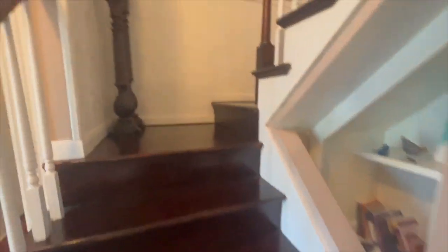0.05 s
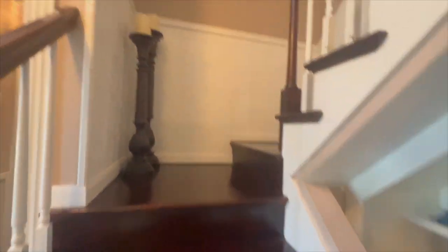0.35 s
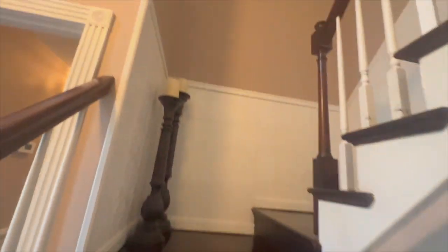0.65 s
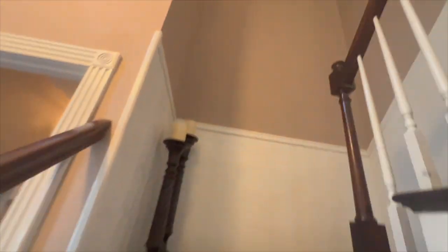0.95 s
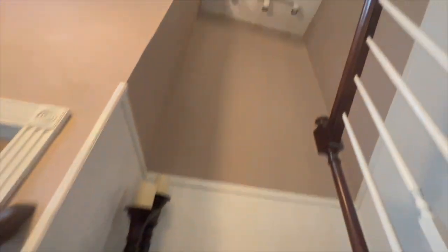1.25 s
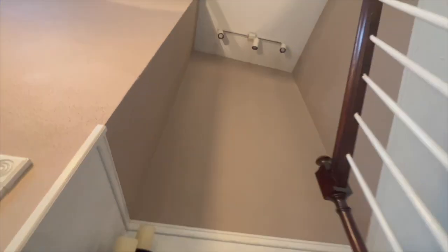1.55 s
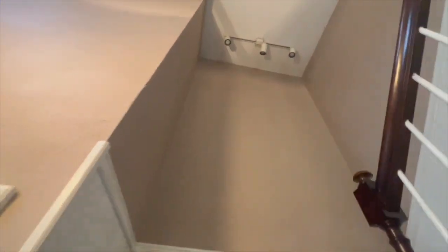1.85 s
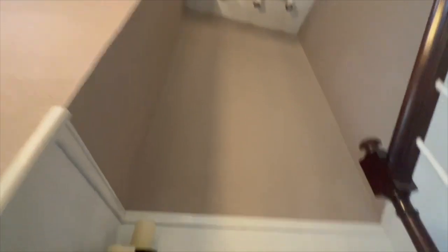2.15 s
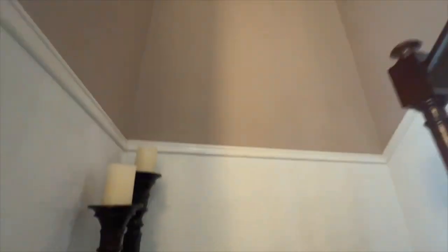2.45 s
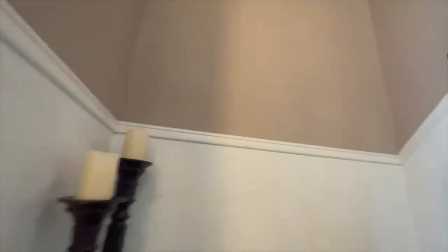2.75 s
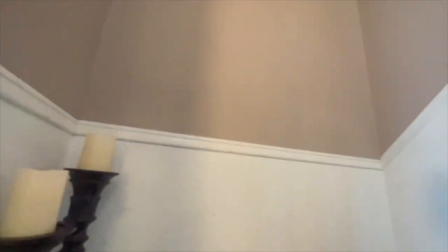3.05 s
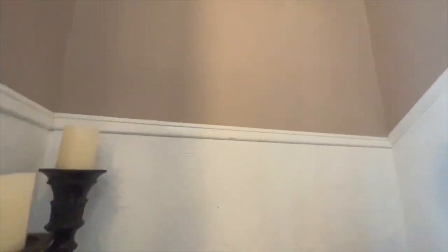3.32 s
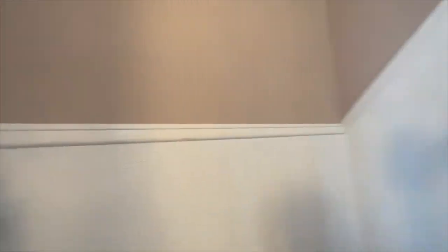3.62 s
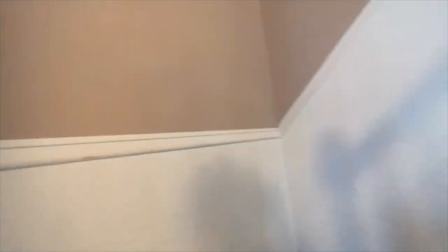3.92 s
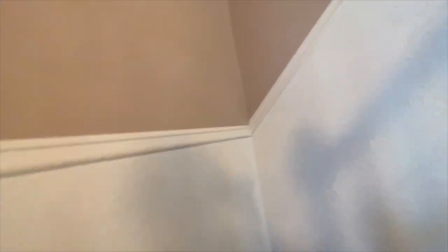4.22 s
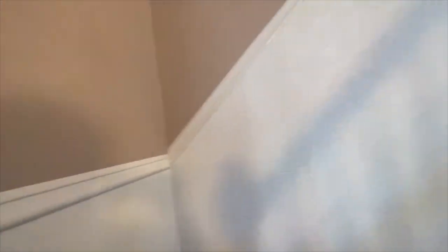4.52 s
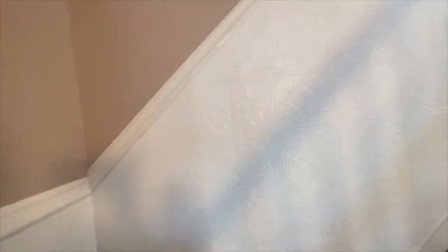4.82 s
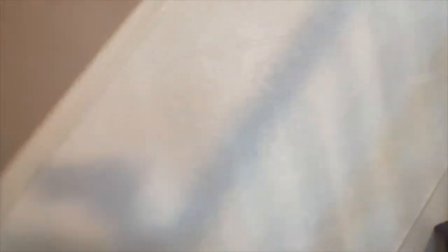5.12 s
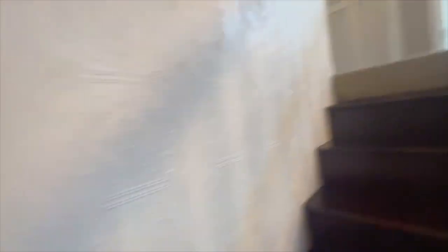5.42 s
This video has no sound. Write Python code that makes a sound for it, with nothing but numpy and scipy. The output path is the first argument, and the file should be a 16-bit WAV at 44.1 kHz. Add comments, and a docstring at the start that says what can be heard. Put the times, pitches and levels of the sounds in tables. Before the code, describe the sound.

Soft footsteps climb a hardwood staircase, heard up close in a stairwell with a short ring. Quiet ventilation and a low, wavering electrical hum continue throughout. A light first step lands at about 0.6 seconds, with sharp wood snaps just before it and near 0.9. Fuller, hollow thuds follow at about 1.5, 2.4, 3.2 and 4.0 seconds, each with small creaks and a faint brush of clothing. Around 1.5 seconds a hand gives a faint, slightly falling squeak on the rail. From 4.0 to 5.1 seconds it gets busier: the feet shuffle lightly, joints snap sharply, boards creak more loudly and fabric swishes. A small metal piece, barely heard earlier, tinkles several times between 4.6 and 5.3 seconds. A last deep step lands at 5.0 seconds, followed by faint creaks and a sleeve rustle at about 5.5.

```python
"""Soft steps up a wooden staircase

Someone climbs hardwood stairs in soft footwear, heard up close over ventilation and a mains hum.
Each footfall drums a hollow tread; joints snap and boards creak under the weight. A hand squeaks on
the rail, clothes brush with the stride and a small metal piece tinkles. The stairwell rings briefly."""
import sys
import numpy as np
from scipy import signal
from scipy.fft import rfft, irfft, next_fast_len
from scipy.io import wavfile
from scipy.ndimage import uniform_filter1d

SR = 44100
rng = np.random.default_rng(int(sys.argv[2]) if len(sys.argv) > 2 else 0)


def store_wav(level_fs):
    """Save 16-bit WAV to argv[1]."""
    pcm = np.round(np.clip(np.atleast_2d(level_fs), -1, 1) * 32767)
    wavfile.write(sys.argv[1], SR, pcm.T.astype(np.int16))


N = 245759
TIME = np.arange(N) / SR


def amp(db):
    """Decibels to gain."""
    return 10 ** (np.asarray(db) / 20)


def unit_rms(x):
    """Scales to rms 1."""
    return x / np.sqrt(np.mean(x ** 2) + 1e-20)


def curve_at(points, hz):
    """Reads a curve on a log-frequency axis."""
    f, value = np.transpose(points)
    return np.interp(np.log(hz + 1), np.log(f + 1), value)


def automation(rows):
    """Each column of a timed table, ramped from sample to sample."""
    times, *columns = np.transpose(rows)
    return [np.interp(TIME, times, column) for column in columns]


def eq(x, curve):
    """Filters by an EQ curve in dB."""
    size = next_fast_len(N + 4096)
    gain = amp(curve_at(curve, np.fft.rfftfreq(size, 1 / SR)))
    return irfft(rfft(x, size) * gain, size)[..., :N]


def band(x, hz, spread, order=1):
    """Band-pass from hz / spread to hz * spread."""
    edges = [hz / spread, min(hz * spread, .48 * SR)]
    return signal.sosfilt(signal.butter(order, edges, "bandpass", fs=SR, output="sos"), x)


def lowpass(x, hz, order=2):
    """Rolls off the treble above hz."""
    return signal.sosfilt(signal.butter(order, hz, fs=SR, output="sos"), x)


def ring(modes, t):
    """Damped modes struck at time zero."""
    return sum(amp(db - 60 * t / t60) * np.cos(2 * np.pi * hz * t) for hz, db, t60 in modes)


def pan(pan_db):
    """Stereo gains; pan is always left minus right in dB."""
    return amp([[pan_db / 2], [-pan_db / 2]])


def place(mix, start, sound, db, pan_db):
    """Adds a sound to the mix, its peak set to db before panning."""
    part = mix[:, max(round(start * SR), 0):][:, :sound.shape[-1]]
    part += (sound / abs(sound).max() * amp(db) * pan(pan_db))[:, :part.shape[1]]


# reverb time of the stairwell: f/Hz, t60/s
REVERB_DECAY = [(60, 0.54), (130, 0.35), (280, 0.73), (600, 0.29), (1500, 0.25), (5000, 0.26),
                (10000, 0.35), (16000, 0.18)]
# tone of the wall reflections: f/Hz, level/dB
REVERB_EQ = [(60, -4), (150, -5), (255, 2.5), (390, 2), (600, 5), (2000, 2), (8000, -5), (14000, -2)]
def stairwell(x, wet_db, mono_below_hz):
    """Adds dense reflections that die away band by band and narrow to mono in the bass."""
    hz, t, bins = signal.stft(rng.standard_normal((2, SR * 3 // 4)), SR, nperseg=256)
    likeness = 1 / (1 + (hz[:, None] / mono_below_hz) ** 2)
    bins[1] = likeness * bins[0] + np.sqrt(1 - likeness ** 2) * bins[1]
    decay = amp(-60 * t / curve_at(REVERB_DECAY, hz)[:, None])
    tail = signal.istft(bins * decay, SR, nperseg=256)[1]
    tail *= np.clip(np.arange(tail.shape[1]) / SR / 0.0035 - 1, 0, 1)  # pre-delay to the nearest wall
    wet = signal.fftconvolve(x, tail / np.linalg.norm(tail[0]), axes=1)[:, :N]
    return x + amp(wet_db) * eq(wet, REVERB_EQ)


# room tone of the house: f/Hz, level/dB
VENTILATION_EQ = [(20, -47), (45, 2.5), (65, 3), (110, 5), (170, -6), (260, -9.5), (400, -10.5), (700, -21),
                  (1400, -21), (1800, -14), (2400, -28), (5000, -35), (9000, -34.5), (15000, -46.5)]
# its stereo image: f/Hz, left-right correlation
VENTILATION_LIKENESS = [(50, 0.53), (150, 0.79), (400, 0.43), (1000, 0.047), (3000, 0.033), (15000, 0.19)]
def ventilation():
    """A steady bed of moving air and rumble, narrow in the bass and wide in the treble."""
    left, other = rfft(rng.standard_normal((2, N + 1)))
    likeness = curve_at(VENTILATION_LIKENESS, np.fft.rfftfreq(N + 1, 1 / SR))
    right = likeness * left + np.sqrt(1 - likeness ** 2) * other
    return amp(-52.5) * unit_rms(eq(irfft([left, right])[:, :N], VENTILATION_EQ))


# the fundamental swells and shifts along the climb through standing waves: t/s, level/dB, pan/dB
HUM_RIDE = [(0, -58.5, -4), (0.7, -50.5, -0.5), (1.7, -55, -12), (2.2, -46.5, -5.5), (2.65, -43.5, 2.5),
            (3, -41.5, 6), (3.7, -37.5, 2.5), (4.3, -45.5, 14), (4.7, -50, -13), (5.25, -42, -5.5),
            (5.57, -41.5, -3)]
def mains_hum(hz=120):
    """An appliance hums at twice the mains frequency, with two faint, steady overtones."""
    phase = 2 * np.pi * hz * TIME
    db, pan_db = automation(HUM_RIDE)
    fundamental = amp(db + np.array([pan_db, -pan_db]) / 2) * np.sin(phase)
    return fundamental + amp(-67.5) * np.sin(2 * phase) + amp(-75.5) * np.sin(3 * phase)


def cloth(strokes, tone, attack_share, slide_db, fade_20db_s, grain_db):
    """Fibres catch in tiny patches: grainy noise that swells, slides on and fades with each stroke."""
    hz, t, bins = signal.stft(rng.standard_normal((2, N)), SR, nperseg=256)
    octaves = np.log2(np.maximum(hz, 500) / 5000)
    power = 0
    for start, length, db, tilt in strokes:
        spectrum = unit_rms(amp(curve_at(tone, hz) + tilt * octaves))
        progress = np.clip((t - start) / length, 0, 1)
        attack = np.minimum(progress / attack_share, 1)
        release_db = -20 * np.maximum(t - start - length, 0) / fade_20db_s
        envelope = attack * amp(db + slide_db * progress + release_db)
        power = power + np.outer(spectrum, envelope) ** 2
    patches = uniform_filter1d(rng.standard_normal(power.shape), size=20, axis=0)
    patches = unit_rms(uniform_filter1d(patches, size=4, axis=1))
    return signal.istft(bins * np.sqrt(power) * amp(grain_db * patches), SR, nperseg=256)[1][:, :N]


# leg swishes: t/s, length/s, level/dB, tilt/(dB per octave)
TROUSER_STROKES = [(.76, 0.47, -63, -5), (1.48, 0.1, -59, -4), (1.75, 0.21, -57.5, 6),
                   (1.95, 0.34, -54.5, 3), (2.42, 0.46, -61, -6), (3.58, 0.61, -68.5, -3),
                   (4.07, 0.098, -55, -5), (4.28, .12, -55, -5.5), (4.52, 0.17, -53.5, -2.5),
                   (4.72, 0.37, -56.5, -6), (5.02, 0.14, -51, -1.5)]
# tone of the trouser fabric: f/Hz, level/dB
TROUSER_EQ = [(300, -14.5), (900, -4.5), (2500, -5.5), (3500, -8.5), (4500, -6), (6500, -1), (9000, 0.5),
              (11000, -4.5), (15500, -17)]
def trousers():
    """Trouser cloth brushes as a leg swings."""
    return pan(1.5) * cloth(TROUSER_STROKES, TROUSER_EQ,
                            attack_share=0.33, slide_db=-1.56, fade_20db_s=0.29, grain_db=1.5)


# arm swishes: t/s, length/s, level/dB, tilt/(dB per octave)
SLEEVE_STROKES = [(.01, 0.25, -58, 5.5), (2.65, 0.27, -55, 2.5), (3.38, 0.3, -63, 6.5),
                  (4.24, 0.32, -51.5, -2), (4.63, 0.28, -55.5, -1.5), (5.42, 0.23, -58, 4)]
# tone of the sleeve fabric: f/Hz, level/dB
SLEEVE_EQ = [(500, -11), (1500, -5), (3000, -7), (3950, -5), (4420, 2.5), (5100, -3), (5800, 1),
             (7000, -1.5), (8500, -0.5), (9800, -5), (11000, -13), (15500, -31)]
def sleeve():
    """The left sleeve slides as the arm reaches forward."""
    return pan(6.5) * cloth(SLEEVE_STROKES, SLEEVE_EQ,
                            attack_share=0.23, slide_db=-4.5, fade_20db_s=0.2, grain_db=1.3)


# modes of the small metal piece: f/Hz, level/dB, t60/s
METAL_MODES = [(9650, -7.5, 0.056), (9740, 8, 0.0093), (11050, -11, 0.017), (4330, -13, 0.019),
               (10060, -13, 0.02)]
# its shakes: t/s, level/dB
TINKLE_CUES = [(.060, -41.5), (1.433, -45.5), (3.645, -49.5), (4.6, -37), (4.619, -41), (4.681, -37.5),
               (4.792, -45), (4.86, -37), (4.887, -42), (4.956, -42), (5.264, -35.5), (5.297, -52)]
def tinkles():
    """Light metal, shaken by the stride, chatters for a moment and rings near its few high modes."""
    out, t = np.zeros((2, N)), np.arange(4096) / SR
    swell = t / 0.0056
    for start, db in TINKLE_CUES:
        chatter = rng.standard_normal((2, len(t))) * swell * np.exp(-swell)
        detune = 1 + 0.0142 * rng.standard_normal()
        metal = ring(METAL_MODES, t * detune)
        ringing = unit_rms(signal.fftconvolve(chatter, metal[None], axes=1)[:, :len(t)])
        sizzle = unit_rms(band(chatter, 7700, spread=1.6, order=2))
        place(out, start - .003, ringing + 0.29 * sizzle, db, pan_db=-3.5)
    return stairwell(out, wet_db=-4.5, mono_below_hz=405)


# the palm dragging on the rail: t/s, level/dB, f/Hz
SQUEAK_GLIDE = [(1.412, -62, 1540), (1.432, -58.5, 1535), (1.465, -55, 1500), (1.51, -58, 1418),
                (1.58, -56, 1430), (1.625, -58.5, 1387), (1.68, -73, 1370)]
def rail_squeak():
    """Skin on varnish: a raspy, fuzzy whistle that sinks as the hand slows."""
    db, hz = automation(SQUEAK_GLIDE)
    noise = rng.standard_normal((2, N))
    flutter = unit_rms(lowpass(noise, 85))
    rasp = unit_rms(lowpass(noise[::-1], 420))
    wobble = flutter + 0.58 * rasp
    phase = 2 * np.pi * np.cumsum(hz) / SR
    whistle = unit_rms(wobble[0] * np.cos(phase) - wobble[1] * np.sin(phase))
    gate = (TIME > SQUEAK_GLIDE[0][0]) & (TIME < SQUEAK_GLIDE[-1][0])
    return stairwell(whistle * gate * amp(db) * amp([[2], [-2.5]]), wet_db=-10, mono_below_hz=900)


def faint_creak_cues(per_step=2, db=-54, hz=1070, length_s=0.022):
    """Cues for small random creaks while a tread takes the weight after each step."""
    cues = []
    for step_s, *_ in STEP_CUES:
        for when, loud, pitch, side in rng.uniform(-1, 1, (per_step, 4)):
            start = step_s + .33 + .21 * when
            cues.append((start, db - 2.5 * loud, hz * 2 ** (0.31 * pitch), length_s, 4 * side))
    return cues


# featured creaks: t/s, level/dB, f/Hz, decay of the slips/s, pan/dB
CREAK_CUES = [(0.178, -49, 463, 0.016, -7), (0.503, -43.5, 1520, .004, 8), (0.911, -47, 1840, 0.021, -5),
              (0.947, -43, 1470, 0.057, -1), (1.2145, -47, 1140, .002, 1), (1.423, -46.5, 1050, 0.022, 8),
              (2.21, -48.5, 970, 0.013, -2), (2.636, -48.5, 700, .0015, 3), (2.846, -44, 610, 0.0028, -3),
              (4.29, -42, 426, 0.026, -8), (4.35, -38, 1380, 0.03, -6.5), (4.6014, -35.5, 965, 0.012, -2.5),
              (4.759, -39, 990, 0.0072, -11), (4.768, -31.5, 1320, 0.0074, 1),
              (4.782, -34.5, 490, .0036, -4), (4.843, -32, 810, 0.0069, -5), (4.998, -44, 905, 0.0073, 0),
              (5.099, -47, 1310, 0.025, -9), (5.264, -50.5, 1100, 0.056, 2)]
def creaks(slips_per_s=900):
    """Boards stick and slip: a first jerk, then a fading random run, each briefly ringing the wood."""
    out, t = np.zeros((2, N)), np.arange(8192) / SR
    for start, db, hz, decay_s, pan_db in CREAK_CUES + faint_creak_cues():
        sizes = rng.standard_normal(len(t)) + .5 * rng.standard_normal((2, len(t)))
        slipping = rng.random(len(t)) < slips_per_s / SR
        slips = 0.69 * sizes * slipping * np.exp(-t / decay_s)
        slips[:, 0] = 1
        knock = band(slips, hz, spread=1.25) + 0.19 * slips  # the board's note and the jerk itself
        place(out, start, band(knock, hz, spread=2.0, order=2), db, pan_db)
    return stairwell(out, wet_db=-5.5, mono_below_hz=890)


# sharp snaps of the wood joints: t/s, pre-EQ level/dB, f/Hz, pan/dB
SNAP_CUES = [(0.5017, -39, 3410, 0), (0.9474, -33.5, 3054, 0), (2.618, -50, 5500, 2),
             (4.045, -38, 6300, -1), (4.074, -30, 6020, -1), (4.5018, -25.5, 5410, 1),
             (4.7685, -45.5, 2760, -4), (4.9574, -47, 9100, -13.5), (5.0273, -45, 3880, -4),
             (5.0997, -32.5, 5730, -4.5), (5.322, -47, 5570, 3)]
# tone shared by all snaps: f/Hz, level/dB
SNAP_EQ = [(500, 16.5), (2000, 3.5), (4000, 4.5), (9000, 5.5), (11500, 0.5), (15500, -10)]
def snaps():
    """A joint lets go in a crack of a few milliseconds; the boards around it ring on faintly."""
    out, t = np.zeros((2, N)), np.arange(4096) / SR
    for start, db, hz, pan_db in SNAP_CUES:
        crack = rng.standard_normal((2, len(t))) * np.exp(-t / 0.0045) * (1 - np.exp(-t / 0.00014))
        board_hz = hz * 2 ** rng.uniform(-1.3, .6, (2, 12, 1))
        ringing = np.sin(2 * np.pi * board_hz * t).mean(1) * np.exp(-t / 0.014)
        place(out, start, band(crack + 0.36 * ringing, hz, spread=2.14), db, pan_db)
    return stairwell(eq(out, SNAP_EQ), wet_db=-0.5, mono_below_hz=397)


# modes of the hollow stair, before each step's varispeed: f/Hz, level/dB, t60/s
TREAD_MODES = [(56.3, 1, 0.76), (67.6, 2.5, 0.19), (99, -11, 0.045), (114.6, 10.5, 0.15), (135, 5, 0.096),
               (187, -12, .08), (204, -9, 0.097), (235.6, 6.5, 0.041), (266.4, -2.5, 0.089),
               (296, -5, 0.22), (409, -12, 0.029), (510, -16, 0.023), (540, -34, 0.11), (680, -29.5, 0.097),
               (810, 4.5, 0.029), (1880, -6, 0.012), (1395, 9.5, 0.017), (1580, -22, .025),
               (1890, -20, .025)]
# three hits as a foot rolls, relative to its ball cue: t/roll time, level/dB, f/ball f, pan/dB
ROLL_HITS = [(0.432, -2, 1.73, -2), (0.998, -0.5, 0.96, -4.5), (2.06, -3, .81, 2.5)]
# steps and shuffles: touch t/s, touch level/dB, roll time/s, ball level/dB, ball f/Hz (high = hard),
# sole delay/s, sole level/dB, sole f/Hz, tread varispeed/ratio, pan/dB
STEP_CUES = [(0.617, -56, 0.0055, -42.5, 250, 0.053, -36.5, 180, 1.13, -3),
             (1.5206, -37, 0.0072, -27.5, 234, 0.055, -39.5, 141, 0.81, -0.5),
             (2.393, -25.5, .0102, -24.5, 304, 0.03024, -27.5, 110, .975, -0.5),
             (3.162, -39.5, .011, -29, 210, 0.0301, -24.5, 97, 1.03, 0.5),
             (4.043, -33.5, 0.0072, -22.5, 125, .0318, -30.5, 78.5, .995, 2),
             (4.289, -57, .026, -37, 195, .05, -34, 93, 1.07, -1.5),
             (4.354, -38.5, 0.0106, -38, 297, 0.051, -36.5, 57.6, 1.2, -1.5),
             (4.501, -50.5, 0.00743, -36.5, 204, .053, -33, 54.8, 0.98, -2.5),
             (4.995, -47, .0085, -23.5, 95, .051, -41, 88.6, 1.011, -0.5)]
def footfalls(slap_hz=3400, slap_decay_s=0.032):
    """Each foot touches, rolls onto its ball and settles; softer blows reach lower tread modes."""
    thuds, slaps, t = np.zeros((2, N)), np.zeros((2, N)), np.arange(SR // 2) / SR
    for start, touch_db, roll_s, ball_db, ball_hz, sole_s, sole_db, sole_hz, speed, pan_db in STEP_CUES:
        tread = ring(TREAD_MODES, t * speed)
        touch_hz = 735 * 2 ** ((touch_db + 35) / 9.5)  # an octave brighter for every 9.5 dB harder
        touch = (0, touch_db, touch_hz, 0)
        ball = [(share * roll_s, ball_db + db, ball_hz * ratio, side_db)
                for share, db, ratio, side_db in ROLL_HITS]
        sole = (sole_s, sole_db, sole_hz, 0)
        for delay, db, hz, side_db in [touch, *ball, sole]:
            place(thuds, start + delay, band(tread, hz, spread=1.49, order=2), db, pan_db + side_db)
        slap = rng.standard_normal((2, len(t))) * np.exp(-t / slap_decay_s)  # sole on varnish
        place(slaps, start, band(slap, slap_hz, spread=1.33, order=2), touch_db - 20.5, pan_db)
    thuds[0] = np.interp(TIME - .00018, TIME, thuds[0])  # the feet are nearer the right microphone
    padded = lowpass(thuds, 2350, order=6)  # a soft sole drives no treble in the tread
    return stairwell(padded + slaps, wet_db=-3.5, mono_below_hz=272)


def scene():
    """The climber's clothes, the stairs and the small details over the room tone."""
    clothes = trousers() + sleeve()
    stairs = footfalls() + snaps() + creaks()
    return clothes + stairs + tinkles() + rail_squeak() + mains_hum() + ventilation()


# treble notches of the microphone ports: f/Hz, level/dB
MICROPHONE_EQ = [(4900, 1), (5300, -2), (5700, 0), (6800, -4), (7700, -13), (8150, -2), (10000, -4),
                 (11200, -12.5), (12500, -1)]
def record(dry):
    """The microphone ports notch the treble; a steep high cut trims the very top."""
    high_cut = signal.firwin(511, 15800, window=("kaiser", 9), fs=SR)
    return signal.oaconvolve(eq(dry, MICROPHONE_EQ), high_cut[None], "same", axes=1)


dry = scene()
out = record(dry)
store_wav(out)
```